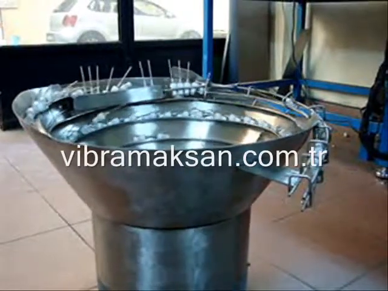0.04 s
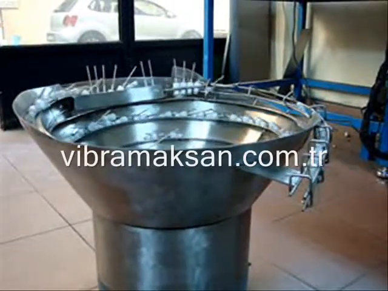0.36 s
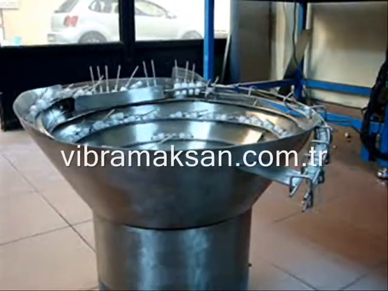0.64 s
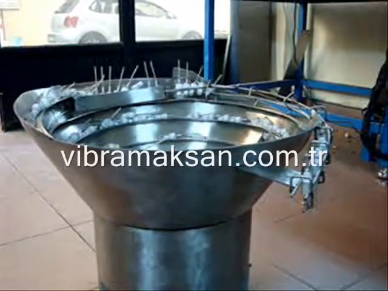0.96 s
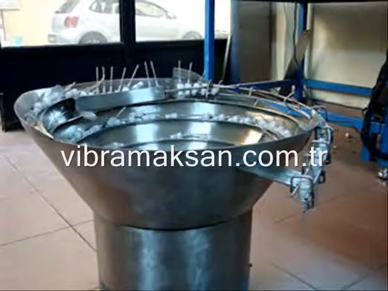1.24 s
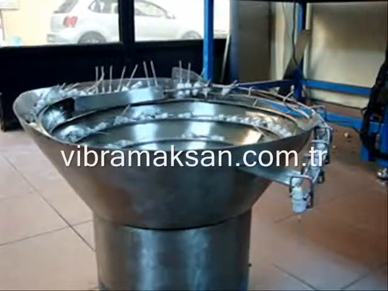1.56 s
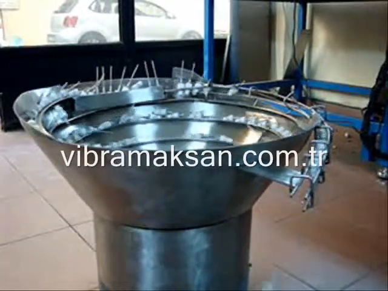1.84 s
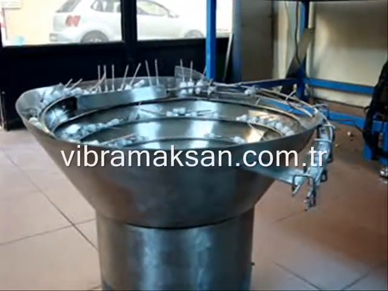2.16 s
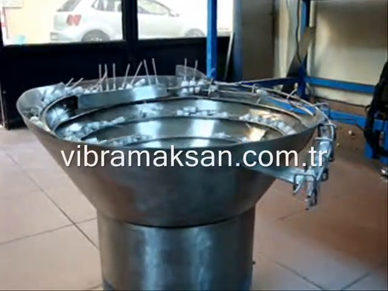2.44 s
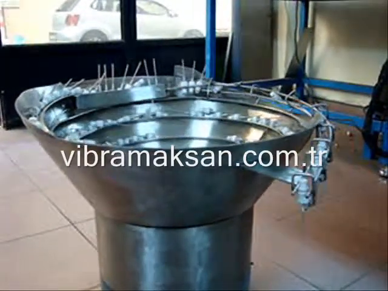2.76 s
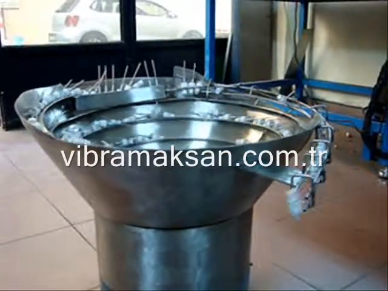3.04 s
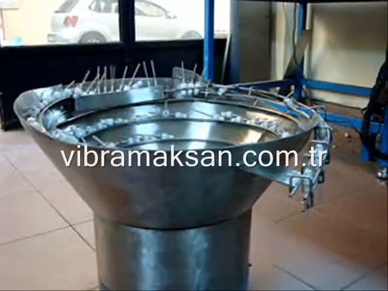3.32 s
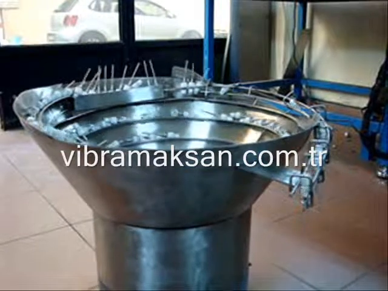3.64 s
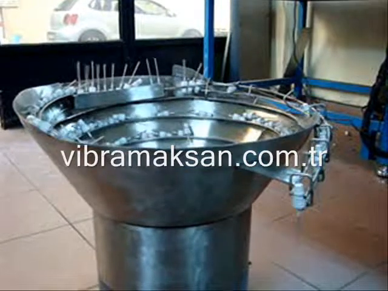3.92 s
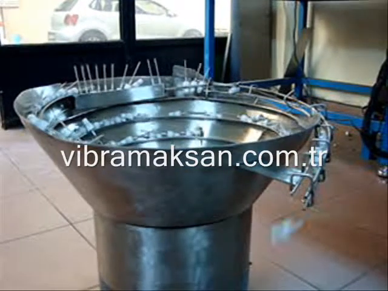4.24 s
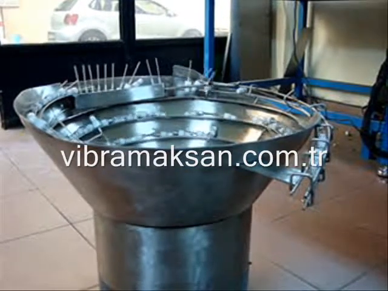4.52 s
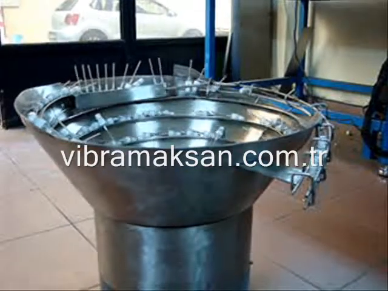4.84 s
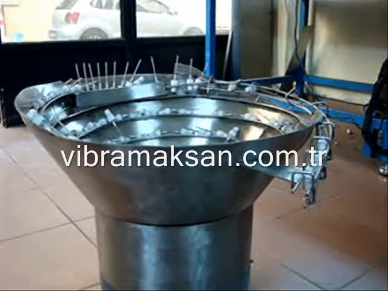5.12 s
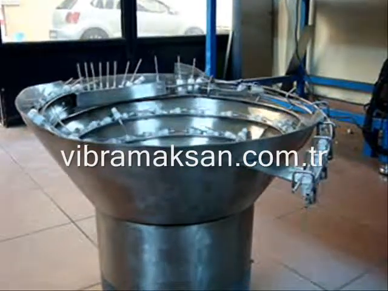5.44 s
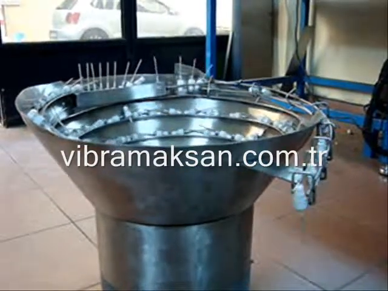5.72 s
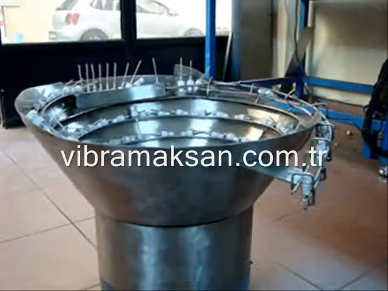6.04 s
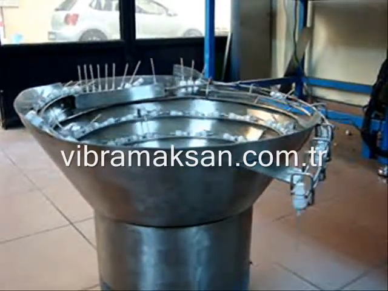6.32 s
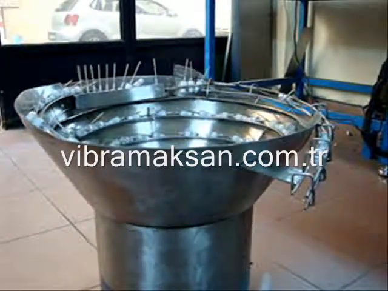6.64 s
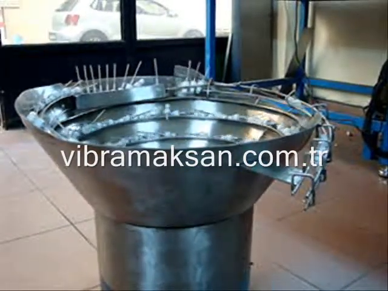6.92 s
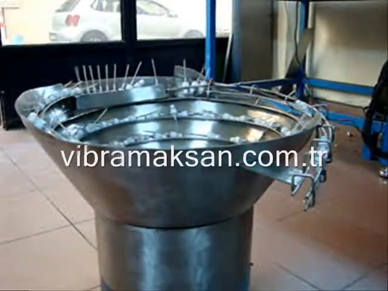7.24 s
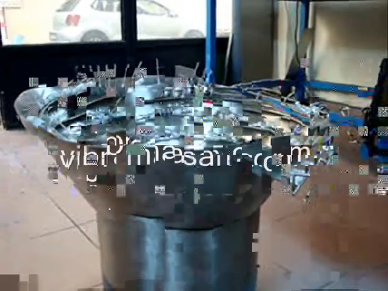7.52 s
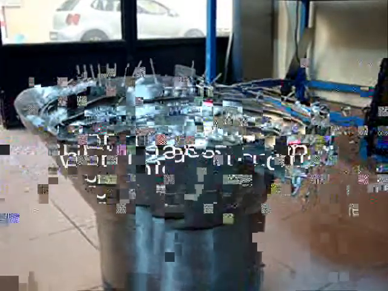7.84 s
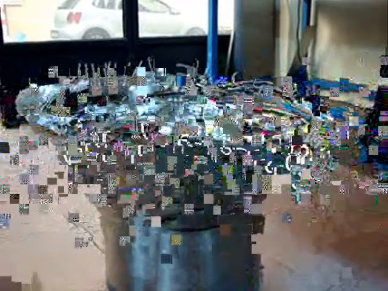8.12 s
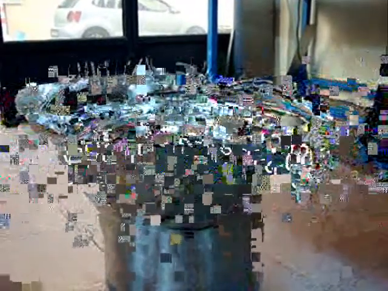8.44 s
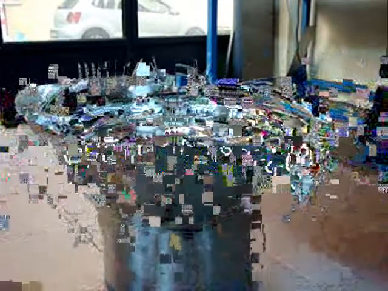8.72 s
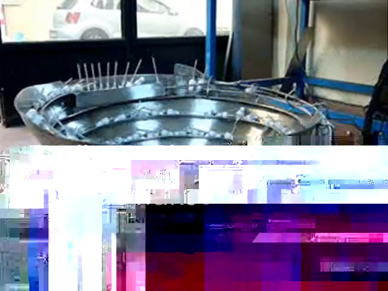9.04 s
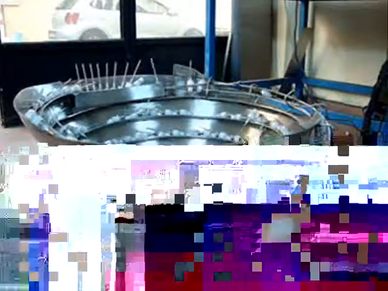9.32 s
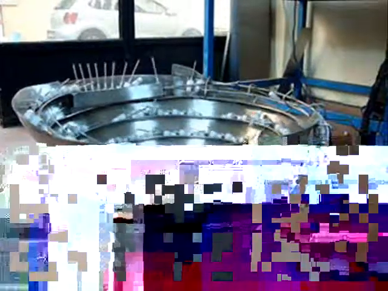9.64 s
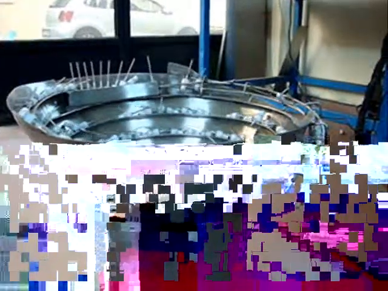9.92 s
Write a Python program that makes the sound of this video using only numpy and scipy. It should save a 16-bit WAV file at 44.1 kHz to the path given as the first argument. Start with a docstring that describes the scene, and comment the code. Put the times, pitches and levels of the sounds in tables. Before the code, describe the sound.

Small parts tick and clatter without pause as they shake along a vibrating steel bowl, over a faint, wavering low hum. Early on, chattering parts make the metal sing briefly a few times; then come scattered dull knocks of dropping parts, with a quick cluster past the middle. The machine stays at an even level in a slightly reverberant workshop, heard through a microphone with limited treble.

```python
"""In a tiled workshop a vibratory bowl feeder runs, heard through a narrow-band recorder.
An electromagnet forces the steel bowl to vibrate at mains rate, and two harmonics hum. Hundreds of small
parts hop along the track; each impact ticks and excites the bowl's normal modes. Now and then the heap
slides, a chattering part makes the steel sing, or a part drops with a dull, quickly damped knock."""
import sys
import numpy as np
from scipy import signal
from scipy.fft import rfft, irfft
from scipy.io import wavfile
from scipy.ndimage import map_coordinates

SR = 44100
rng = np.random.default_rng(int(sys.argv[2]) if len(sys.argv) > 2 else 0)


def output_pcm(signal):
    """Save a mono or channel-first signal as 16-bit PCM at the path in sys.argv[1].

    Samples are clipped to [-1, 1] before scaling.
    """
    pcm = np.clip(np.atleast_2d(signal).T, -1, 1) * 32767
    wavfile.write(sys.argv[1], SR, np.round(pcm).astype(np.int16))


N = 439677
SHAKE_HZ = 49.97
SPLIT_HZ = 1700   # the heap sounds below, the track above


def from_db(db):
    """Amplitude ratio of a level in decibels."""
    return 10 ** (np.asarray(db) / 20)


def rms_one(x):
    """Normalisation to unit rms."""
    return x / np.sqrt(np.mean(x ** 2) + 1e-20)


def seconds():
    """Uniform sampling instants, t/s."""
    return np.arange(N) / SR


def drift(corner_hz):
    """Random fluctuation of unit rms: white noise through a two-pole low-pass."""
    step, settle = 40, 2000
    pole = np.exp(-2 * np.pi * corner_hz * step / SR)
    noise = rng.standard_normal(N // step + settle + 2)
    slow = signal.lfilter([1], [1, -2 * pole, pole * pole], noise)[settle:]
    return np.interp(np.arange(N) / step, np.arange(len(slow)), rms_one(slow))


def swell(centre_s, width_s):
    """Gaussian envelope of unit height; width_s is its full width at half maximum."""
    t, out = seconds(), np.zeros(N)
    near = np.abs(t - centre_s) < 2 * width_s
    out[near] = np.exp(-np.log(2) * (2 * (t[near] - centre_s) / width_s) ** 2)
    return out


def cut(x, hz, kind, order):
    """Butterworth low- or high-pass: a maximally flat passband."""
    return signal.sosfilt(signal.butter(order, hz, kind, fs=SR, output="sos"), x)


def steep_low_pass(x, hz):
    """Elliptic low-pass: slight ripple in exchange for a steep edge."""
    return signal.sosfilt(signal.ellip(12, .1, 80, hz, fs=SR, output="sos"), x)


def colour(x, spectrum, size=2048):
    """Minimum-phase filter through (f/Hz, level/dB) points, made by folding the cepstrum."""
    hz, db = np.transpose(spectrum)
    grid = np.maximum(np.fft.rfftfreq(size, 1 / SR), 1)
    gain = from_db(np.interp(np.log(grid), np.log(hz), db))
    cepstrum = irfft(np.log(gain))
    cepstrum[1:size // 2] *= 2
    cepstrum[size // 2 + 1:] = 0
    return signal.fftconvolve(x, irfft(np.exp(rfft(cepstrum))))[:N]


def ring(clicks, hz, t60):
    """Damped oscillator: each impulse starts a sine that decays by 60 dB in t60 seconds."""
    r, w = from_db(-60 / (t60 * SR)), 2 * np.pi * hz / SR
    return signal.lfilter([0, np.sin(w)], [1, -2 * r * np.cos(w), r * r], clicks + 1e-18)


def agitation(wander_hz=7.9):
    """Amplitude modulation: heap and track levels, in dB, vary as the parts shift."""
    # the heap slides: t/s, width/s, level rise/dB
    slides = [(0.0, 0.059, 3), (6.28, 0.091, 2), (6.537, 0.057, 2.4), (6.983, .12, .8), (7.32, 0.13, 1.1),
              (8.46, .24, 1.5), (9.798, 0.16, 2)]
    # parts crowd on the track or leave a gap: t/s, width/s, level change/dB
    crowds = [(1.05, .25, 0.3), (1.863, .12, 0.9), (3.38, 0.27, -1.5), (4.1, 0.15, 1.0), (5.788, 0.12, 1.6)]
    heap_db = 0.48 * drift(wander_hz) + sum(db * swell(s, width) for s, width, db in slides)
    track_db = 0.25 * drift(wander_hz) + sum(db * swell(s, width) for s, width, db in crowds)
    return heap_db, track_db


def landings(per_s, bunching, spread_db):
    """Poisson impacts of uneven size, a little more frequent on each upstroke of the bowl."""
    stroke = 1 + bunching * np.cos(2 * np.pi * (SHAKE_HZ * seconds() - 3 / 4))
    lands = rng.random(N) < per_s * stroke / SR
    sizes = from_db(spread_db * np.clip(rng.standard_normal(N), -2, 2))
    return rms_one(lands * sizes * rng.choice([-1, 1], N))


def rattle(heap_db, track_db):
    """Shot noise: dense impacts merge into the heap's low clatter and the track's bright ticking."""
    # spectrum of one impact: f/Hz, relative level/dB
    impact_spectrum = [(170, -54.5), (290, -22.5), (420, -24), (540, -15.5), (800, -11), (1000, -4),
                       (1300, -0.5), (1750, -3), (2030, -1.5), (2420, -4.5), (3000, -3.5), (3750, -7),
                       (4450, -10.5), (5000, -36.5)]
    heap = colour(landings(per_s=9000, bunching=.08, spread_db=1.7), impact_spectrum)
    track = colour(landings(per_s=11000, bunching=.1, spread_db=2.5), impact_spectrum)
    heap = rms_one(cut(heap, SPLIT_HZ, "low", order=6))
    track = rms_one(cut(track, SPLIT_HZ, "high", order=6))
    return heap * from_db(heap_db - 24) + track * from_db(track_db - 21)


def workshop(x, t60=0.24, wet_db=-14):
    """Reverberation: hard floor and walls add a diffuse, exponentially decaying tail after 6 ms."""
    t = seconds()[:SR // 2]
    tail = rng.standard_normal(len(t)) * from_db(-60 * t / t60) * (t > .006)
    return x + from_db(wet_db) * signal.fftconvolve(x, tail / np.linalg.norm(tail))[:N]


def bowl(heap_db, track_db, t60_at_1khz=0.43, damping_slope=0.56, wander_db=1.2):
    """Modal superposition: parts land all over the steel, so each blow weights the modes differently."""
    # normal modes of the bowl: f/Hz, rms level/dB
    modes = [(479, -52), (511, -51.5), (549, -50), (571, -46.5), (621, -51), (662, -48.5), (711, -48),
             (754, -48), (861, -42.5), (950, -41), (1012, -40), (1106, -37), (1172, -35), (1213, -42),
             (1303, -37.5), (1319, -36), (1380, -37), (1427, -36), (1615, -38), (1658, -38.5),
             (1825, -41.5), (2000, -36), (2030, -34.5), (2055, -37.5), (2092, -38), (2153, -35.5),
             (2676, -36), (2708, -38.5), (2751, -38.5), (2815, -37), (2875, -38.5), (3058, -36),
             (3235, -36.5), (3262, -37), (3545, -38.5), (3634, -43), (3820, -47.5), (3941, -41),
             (3985, -40), (4172, -39.5)]
    blows = landings(per_s=2000, bunching=.2, spread_db=1.0)
    at = np.flatnonzero(blows)
    out = np.zeros(N)
    for hz, db in modes:
        effort_db = (heap_db if hz < SPLIT_HZ else track_db)[at]
        coupling = rng.standard_normal(len(at))
        creep_db = wander_db * drift(1.95)[at]   # the parts creep along
        clicks = np.zeros(N)
        clicks[at] = blows[at] * coupling * from_db(effort_db + creep_db)
        t60 = t60_at_1khz * (1000 / hz) ** damping_slope   # low modes ring longest
        out += from_db(db) * rms_one(ring(clicks, hz, t60))
    return out


def magnet_hum(fourth_db=-52, fifth_db=-47.5):
    """Forced vibration: harmonics 4 and 5 of the shaking stand out; the lower wavers more."""
    # the hum swells and dips: t/s, width/s, level change/dB of harmonic 4, and of harmonic 5
    sways = [(1.1, 0.23, -5, 2), (1.9, .45, -1, -2), (2.7, 0.39, 4, 2), (3.12, .22, -1, -6),
             (5.75, .3, 4, -1), (6.46, .18, 4.5, -10), (6.6, .14, -14, 1), (7.6, .9, -1, 3),
             (8.45, 0.56, 4, 2), (9.3, 0.27, 3, -5)]
    fourth_sway, fifth_sway = sum(np.outer(dbs, swell(s, width)) for s, width, *dbs in sways)
    phase = 2 * np.pi * SHAKE_HZ * seconds()
    fourth = from_db(fourth_db + fourth_sway + 2.5 * drift(8.6)) * np.sin(4 * phase + 0.55 * drift(3.3))
    fifth = from_db(fifth_db + fifth_sway + drift(4)) * np.sin(5 * phase + 0.28 * drift(1.0))
    return np.sqrt(2) * (fourth + fifth)


def rumble(level_db=-59.0, top_hz=30):
    """Ambient noise: the faint low-frequency background of the workshop."""
    return from_db(level_db) * rms_one(cut(rng.standard_normal(N), top_hz, "low", order=2))


def pings(width_s=.055, waver_rad=.4):
    """Resonance: one mode swells while a part chatters against the steel, then fades."""
    # singing modes: t/s, f/Hz, rms level at the crest/dB
    chatters = [(1.65, 3030, -22), (3.07, 3470, -29), (4.05, 3110, -29), (4.2, 2023, -25)]
    t, wobble = seconds(), waver_rad * drift(13)
    return np.sqrt(2) * sum(from_db(db) * swell(s, width_s) * np.sin(2 * np.pi * hz * t + wobble)
                            for s, hz, db in chatters)


def drops(gain_db=-6.5, body_hz=500):
    """Impulse response: a dropped part strikes damped modes; each knock has its own amount of thud."""
    # dropped parts: t/s, relative level/dB of the blow, and of its low body
    falls = [(4.451, -11, -17), (6.15, -11.5, -23), (6.762, -11, -22), (6.823, -11, -17), (6.902, -13, -22),
             (6.944, -11, -26), (8.608, -16, -26), (9.724, -14, -28)]
    # modes of the knock: f/Hz, relative level/dB, T60/s
    modes = [(343, -15.5, 0.11), (464, -11, 0.093), (574, -3.5, 0.03), (733, 0.5, 0.032), (844, 1, 0.042),
             (1040, 1, 0.022)]
    s, blow_db, body_db = np.transpose(falls)
    at = np.round(s * SR).astype(int)
    scatter_db = rng.normal(0, 1.0, (len(s), len(modes)))
    out = np.zeros(N)
    for k, (hz, db, t60) in enumerate(modes):
        weight_db = (body_db - body_db.max()) * (hz < body_hz)
        clicks = np.zeros(N)
        clicks[at] = from_db(blow_db + db + weight_db + scatter_db[:, k])
        out += (-1) ** k * ring(clicks, hz, t60)
    return from_db(gain_db) * cut(out, 290, "high", order=4)


def scene():
    """Superposition: the sources add in one channel; rattle and knocks reverberate."""
    heap_db, track_db = agitation()
    steel = bowl(heap_db, track_db) + pings()
    knocks = workshop(drops(), t60=.3, wet_db=-5.5)
    clatter = workshop(rattle(heap_db, track_db))
    return (clatter + steel + magnet_hum() + rumble() + knocks)[None]


def record(dry, low_cut_hz=70, band_edge_hz=4555, converter_hz=32000, top_hz=15700):
    """Band limiting and zero-order hold: the converter's steps add a faint fizz of aliased images."""
    narrow = steep_low_pass(dry[0], band_edge_hz)
    held_s = np.floor(seconds() * converter_hz) / converter_hz
    steps = map_coordinates(narrow, [held_s * SR], order=3)
    return steep_low_pass(cut(steps, low_cut_hz, "high", order=1), top_hz)[None]


dry = scene()
out = record(dry)
output_pcm(out)
```